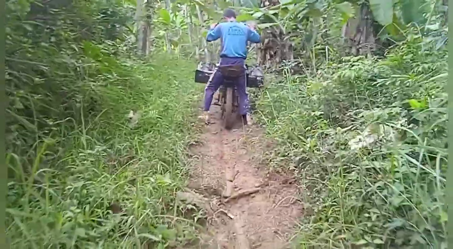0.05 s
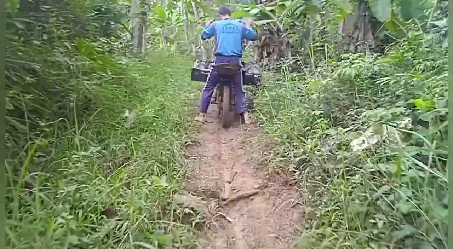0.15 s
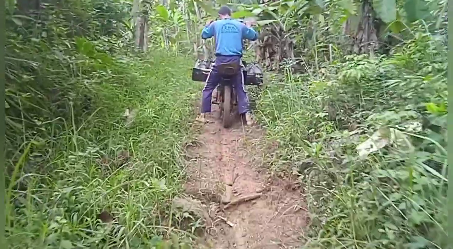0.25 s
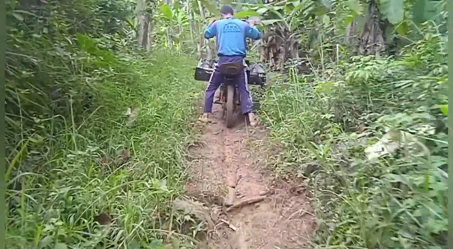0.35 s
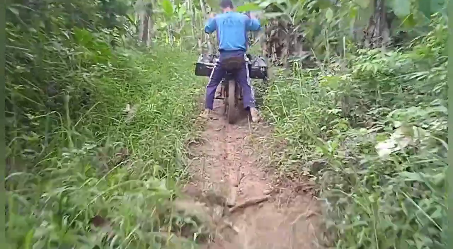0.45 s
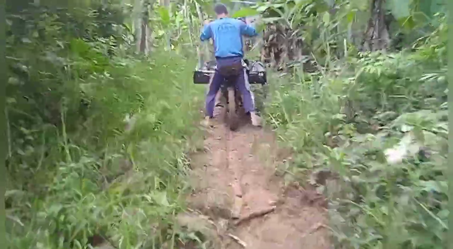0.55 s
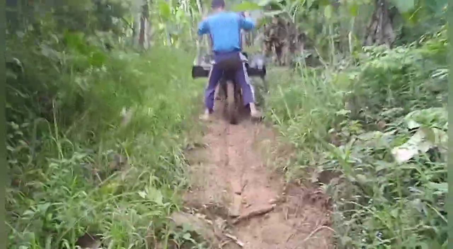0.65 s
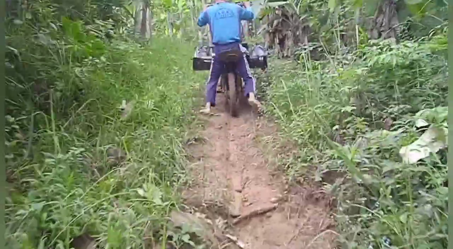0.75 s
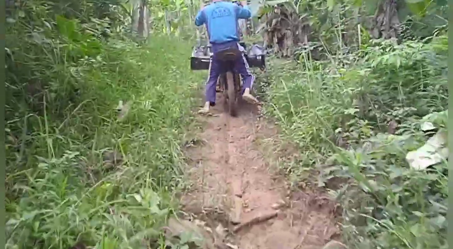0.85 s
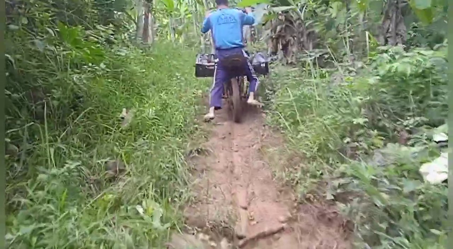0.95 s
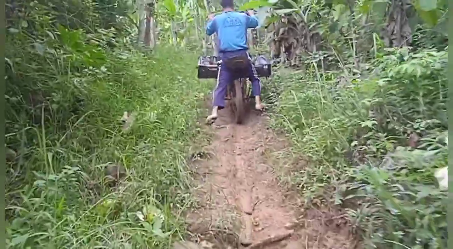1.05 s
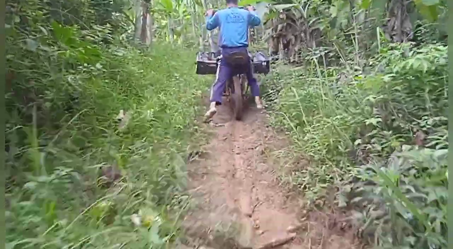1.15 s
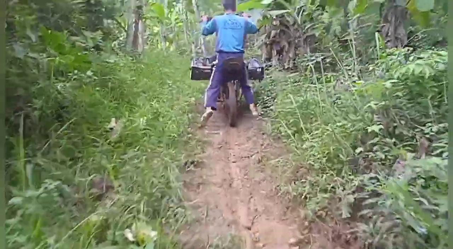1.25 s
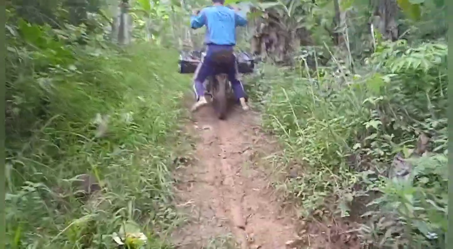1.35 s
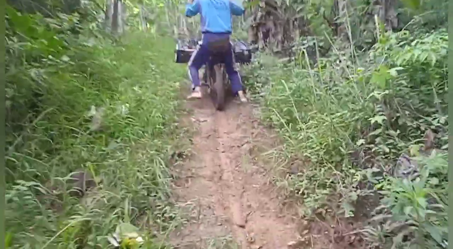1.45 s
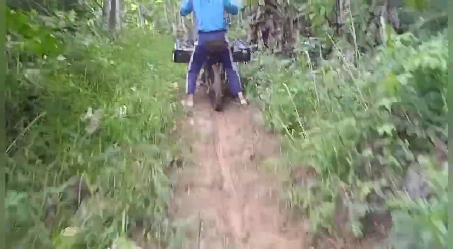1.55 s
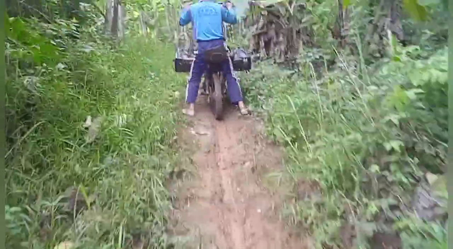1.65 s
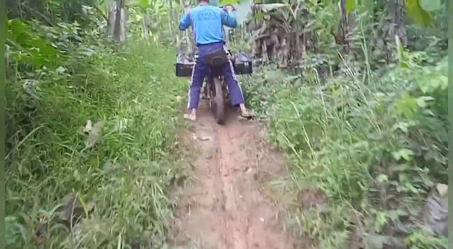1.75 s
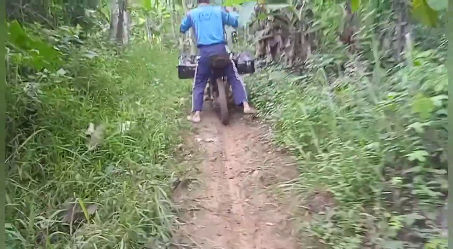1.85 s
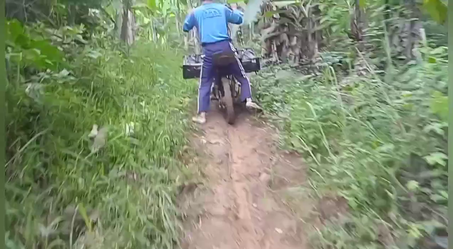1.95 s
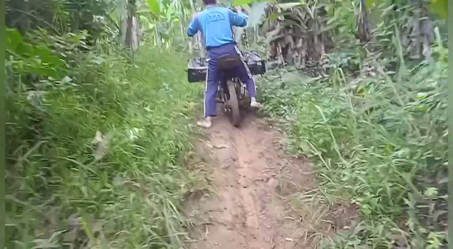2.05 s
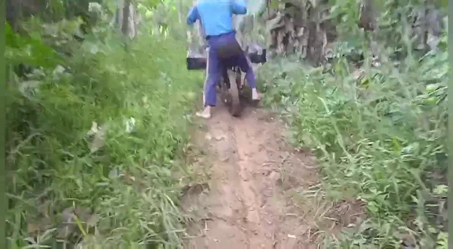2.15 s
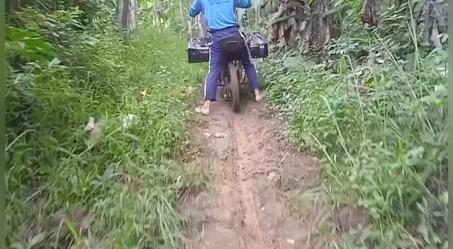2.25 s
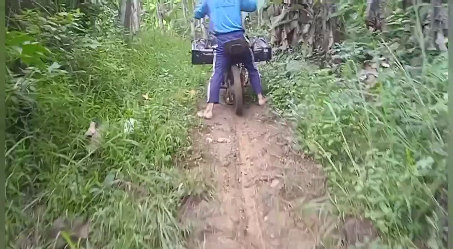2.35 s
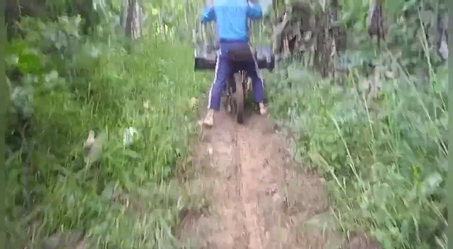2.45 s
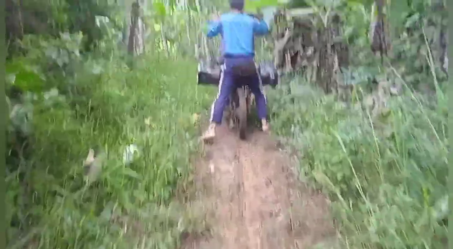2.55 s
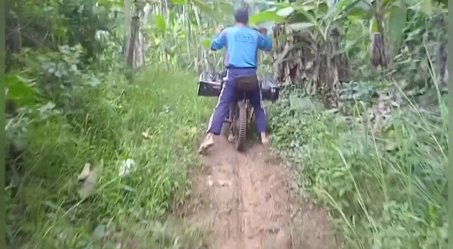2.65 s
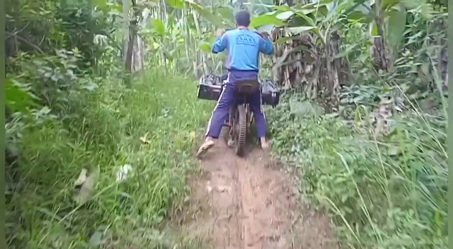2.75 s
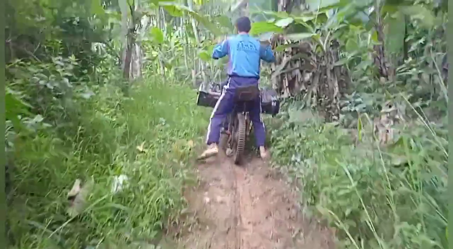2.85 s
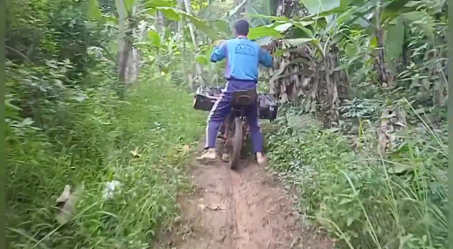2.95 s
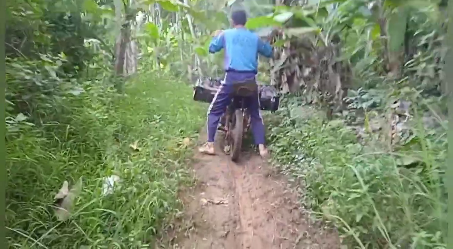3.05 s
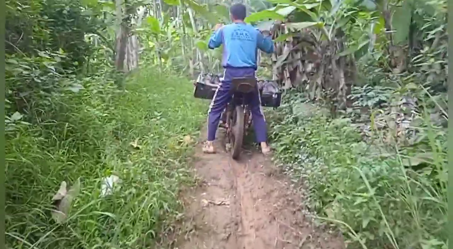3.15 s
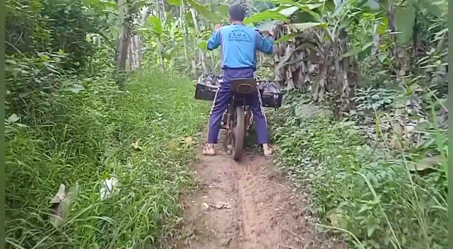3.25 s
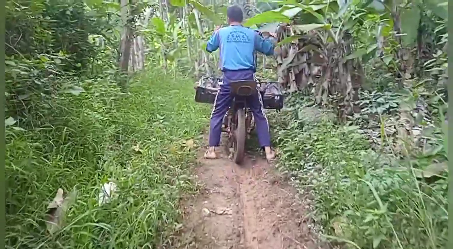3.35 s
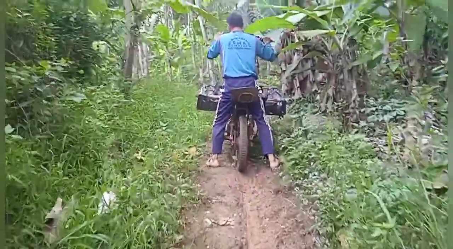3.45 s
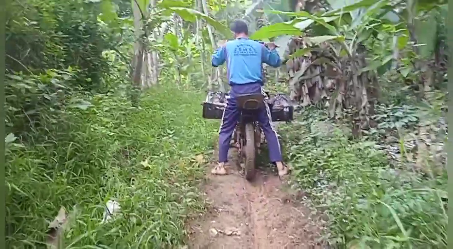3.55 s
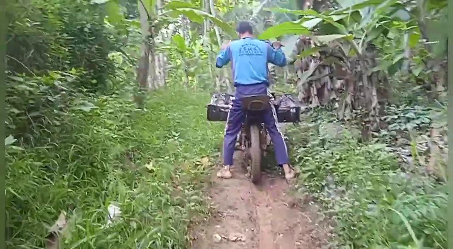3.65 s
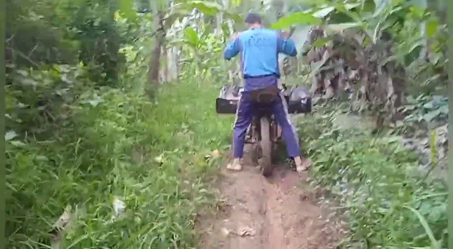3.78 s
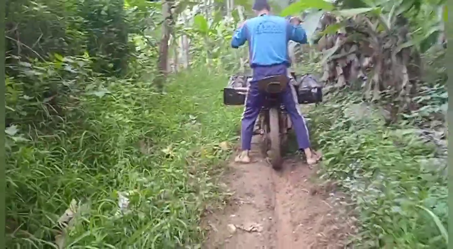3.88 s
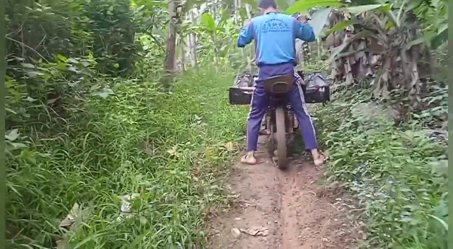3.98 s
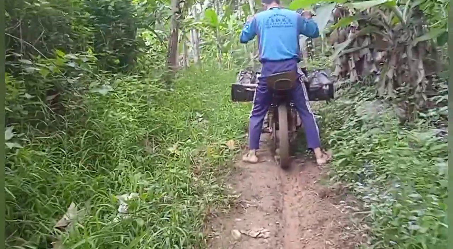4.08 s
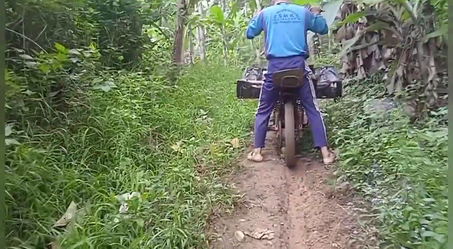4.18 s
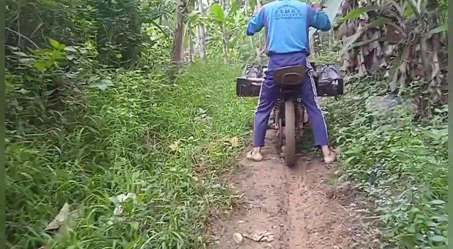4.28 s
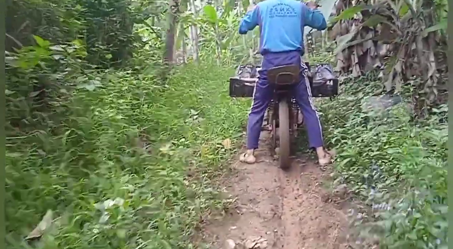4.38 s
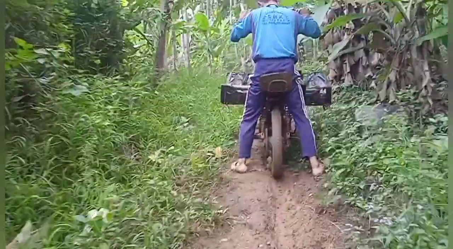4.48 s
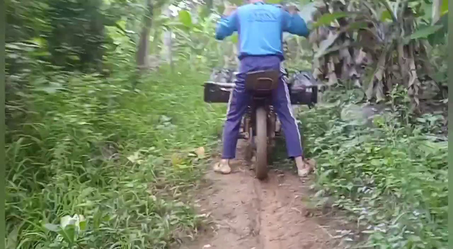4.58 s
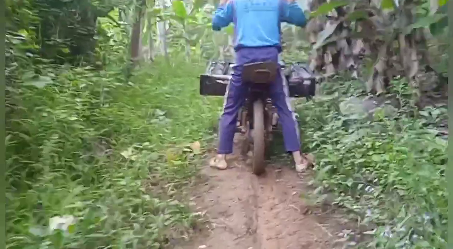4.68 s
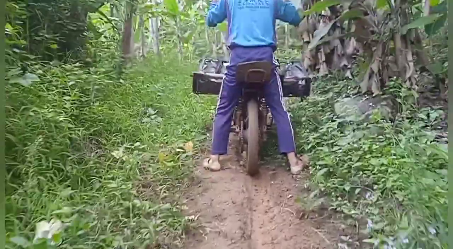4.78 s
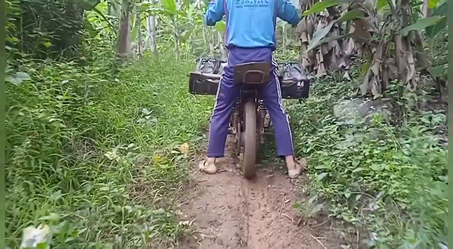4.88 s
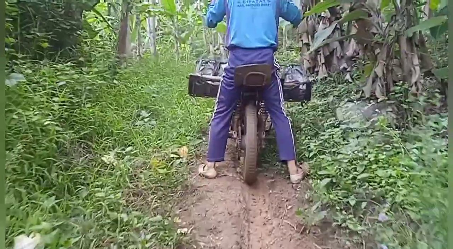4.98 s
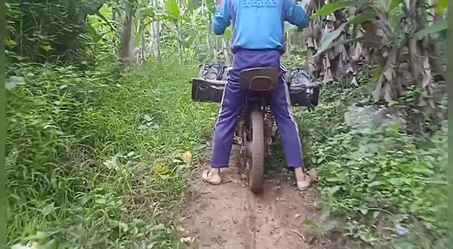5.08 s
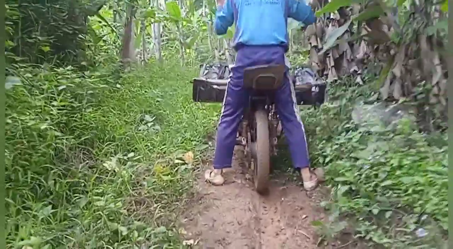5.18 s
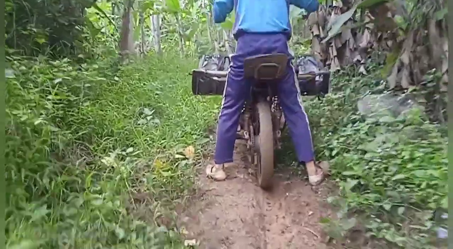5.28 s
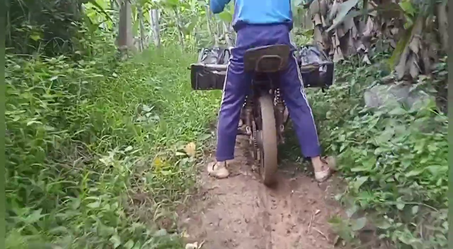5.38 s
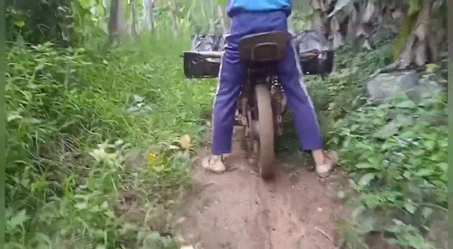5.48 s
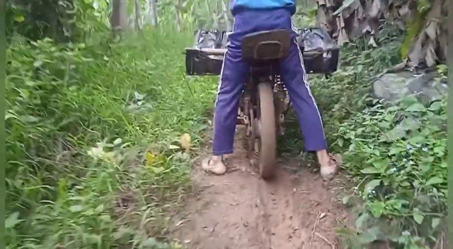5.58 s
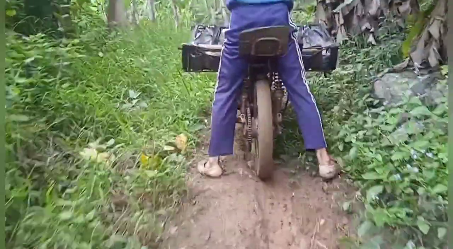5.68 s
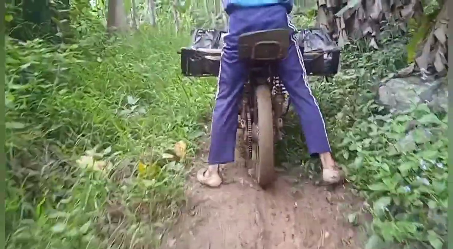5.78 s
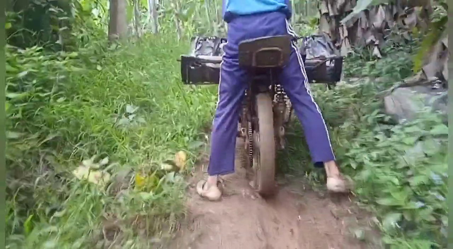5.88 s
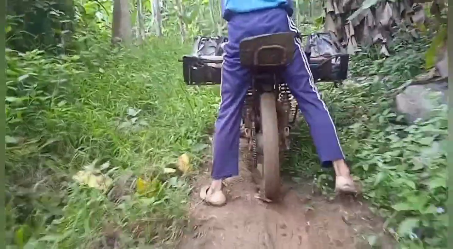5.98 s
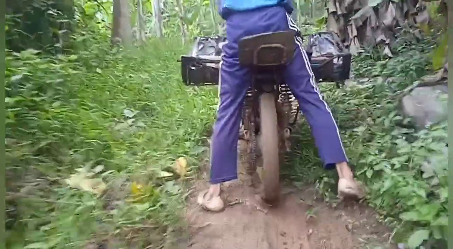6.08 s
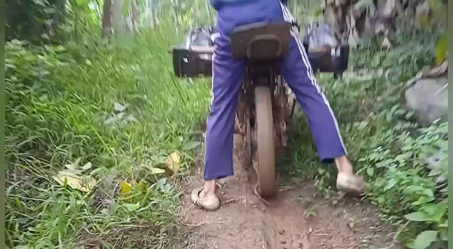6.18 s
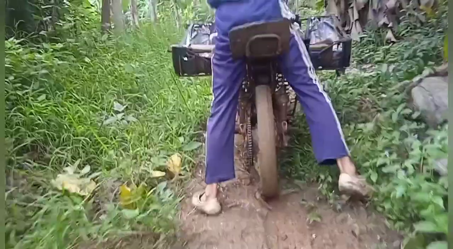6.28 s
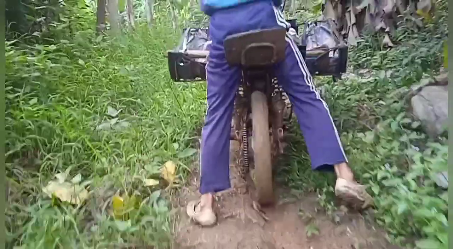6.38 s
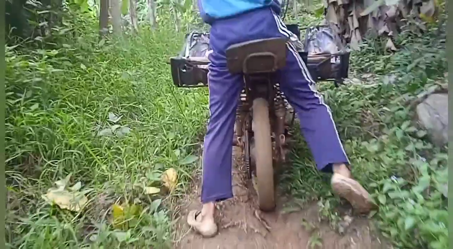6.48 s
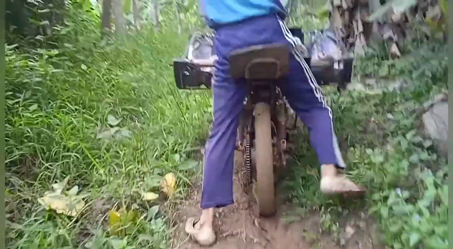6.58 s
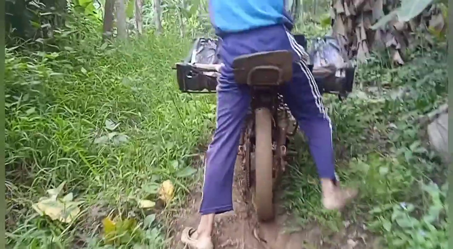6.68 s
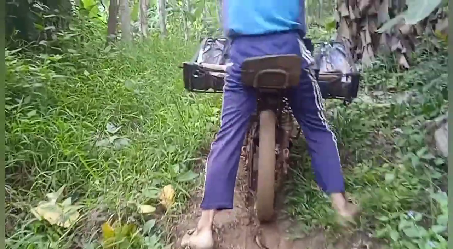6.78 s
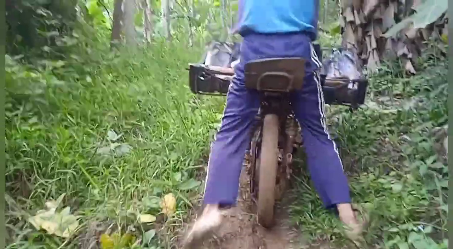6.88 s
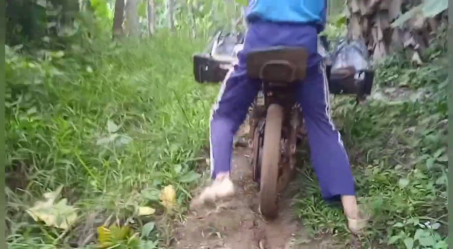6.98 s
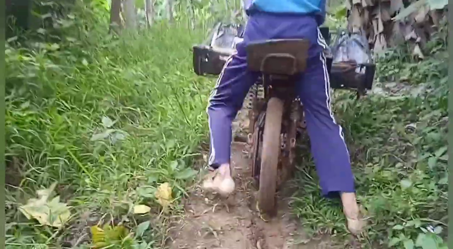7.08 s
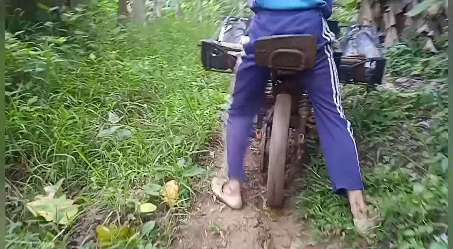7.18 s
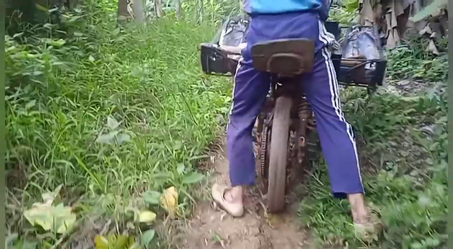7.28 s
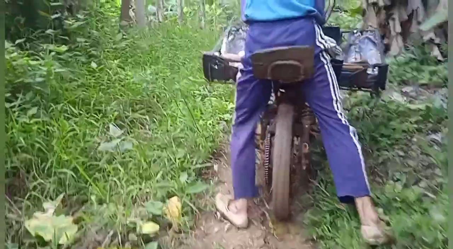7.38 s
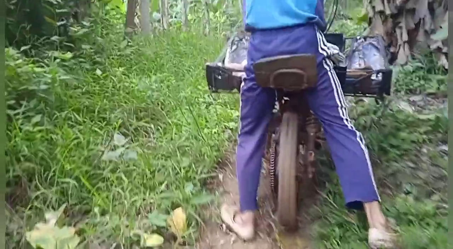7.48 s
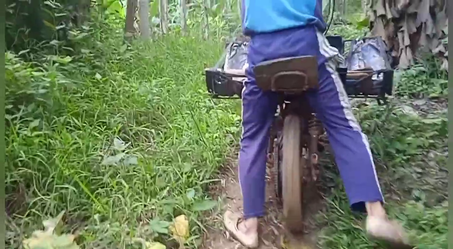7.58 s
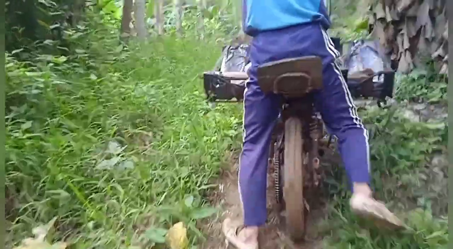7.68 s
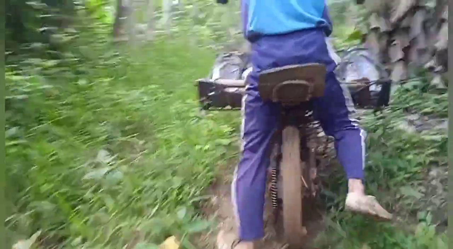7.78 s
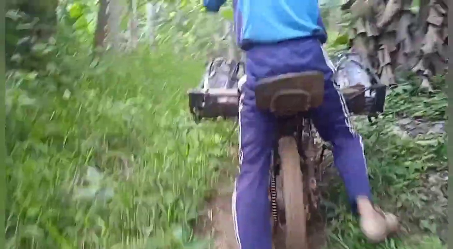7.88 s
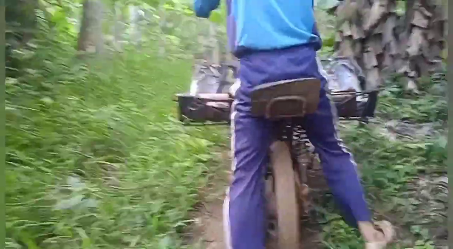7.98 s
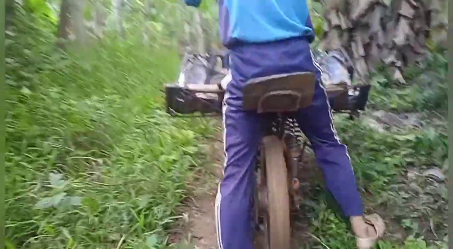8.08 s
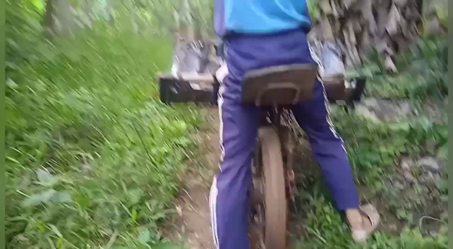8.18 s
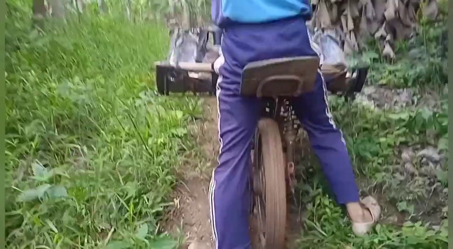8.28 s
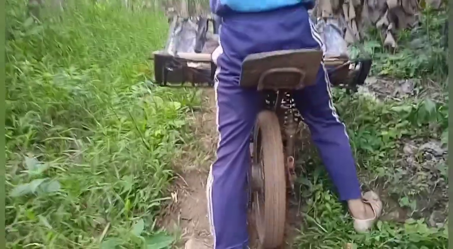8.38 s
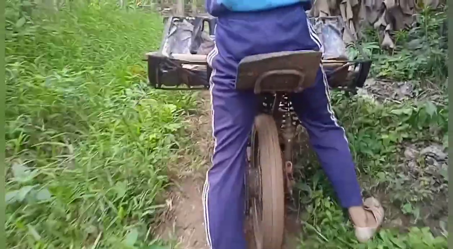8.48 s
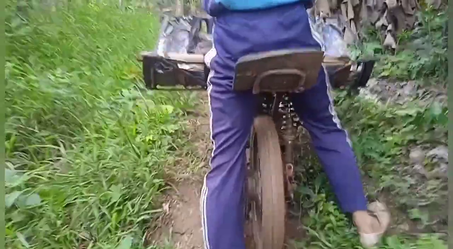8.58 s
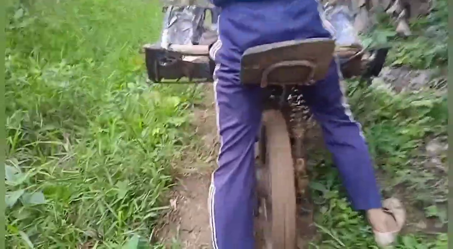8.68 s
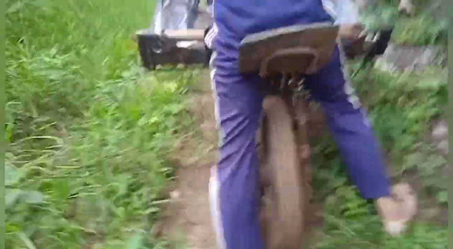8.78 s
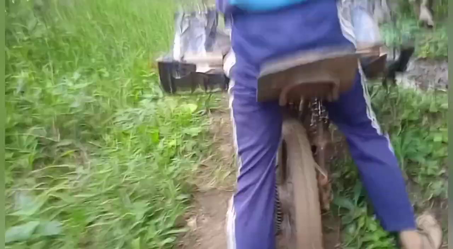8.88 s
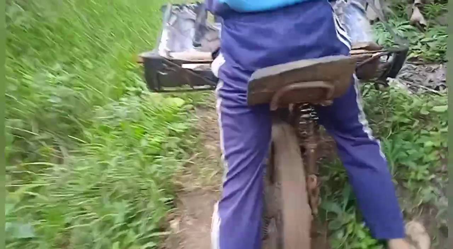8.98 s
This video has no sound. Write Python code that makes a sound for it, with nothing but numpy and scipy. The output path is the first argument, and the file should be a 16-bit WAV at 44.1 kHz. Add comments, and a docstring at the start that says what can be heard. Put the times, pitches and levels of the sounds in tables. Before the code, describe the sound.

A small one-cylinder four-stroke motorcycle runs throughout on a forest track, heard from a few metres behind. Its low, rapid thumping carries a hollow bark, a light metallic ring and a rasp of exhaust, over soft gear and chain clatter. Around 1 second the engine slows and loose metal rattles briefly. It is farthest and quietest at about 1.5 seconds, then draws steadily closer, picking up a little speed from 3 to 5 seconds, with occasional harder pops. From about 3 to 7 seconds a faint, high, pulsing whistle in the exhaust sinks in pitch. The engine dips briefly near 5.7 seconds, now close, and recovers. From 7 seconds it revs up, becoming higher, louder and raspier, and holds that faster beat from about 8.4 seconds to the end at 9. Foliage adds only a very short echo.

```python
"""First you hear the low thumping of a small one-cylinder four-stroke motorcycle on a forest track.
Each firing thumps out of the silencer, rings the pipe and ends in a rasp of escaping gas.
Gears and chain clatter, and a bank and the leaves throw the sound back. Loose metal rattles
as the engine slows, then the gas jet whistles, sinking in pitch. The listener falls behind
at first and then draws close, and near the end the engine revs up."""
import sys
import numpy as np
from scipy import signal
from scipy.fft import rfft, irfft
from scipy.io import wavfile

SR = 44100
rng = np.random.default_rng(int(sys.argv[2]) if len(sys.argv) > 2 else 0)


def materialize(psi):
    """Save the field psi as 16-bit PCM at rate SR to the path in sys.argv[1].

    A 1-D psi becomes a single channel; in a 2-D psi each row is a channel.
    """
    bounded = np.clip(np.atleast_2d(psi).T, -1, 1)
    quanta = np.round(bounded * 32767).astype(np.int16)
    wavfile.write(sys.argv[1], SR, quanta)


N = 398223
SIZE = 4096  # samples in one firing's sound
TIME, AGE, HZ = np.arange(N) / SR, np.arange(SIZE) / SR, np.fft.rfftfreq(SIZE, 1 / SR)
TOP_HZ = 15650


def amp(db):
    """Turns decibels into a gain."""
    return 10 ** (np.asarray(db) / 20)


def at(table, times, column=1):
    """Reads one column of a table at the given times."""
    table = np.asarray(table)
    return np.interp(times, table[:, 0], table[:, column])


def at_pitch(table, hz):
    """Reads a table at the given pitches, with octaves evenly spaced."""
    pitches, values = np.transpose(table)
    return np.interp(np.log(hz + 1), np.log(pitches), values)


def unit(x):
    """Scales each short sound to an energy of one."""
    return x / np.sqrt(np.sum(x ** 2, -1, keepdims=True))


def colour(spectrum):
    """A filter with the given tone colour that never sounds before it is struck."""
    log_gain = np.log(amp(at_pitch(spectrum, HZ)))
    mirrored = np.r_[log_gain, log_gain[-2:0:-1]]
    return np.exp(np.conj(signal.hilbert(mirrored)))[:len(HZ)]


def resonance(hz, width):
    """A filter that rings at one pitch; the narrower it is, the longer it rings."""
    return 1j * HZ * width / (hz ** 2 - HZ ** 2 + 1j * HZ * width)


def body(modes):
    """A filter for an object that rings at several pitches."""
    return sum(amp(db) * resonance(hz, width) for hz, width, db in modes)


def delay(seconds):
    """A filter that makes a sound arrive later."""
    return np.exp(-2j * np.pi * HZ * seconds)


def puffs(times, rise_s, fall_s):
    """The spectrum of one puff of swirling gas for each firing."""
    shape = (1 - np.exp(-(AGE / rise_s) ** 2)) * np.exp(-AGE / fall_s)
    return rfft(unit(rng.standard_normal((len(times), SIZE)) * shape))


# how fast the engine runs: (time [s], rate [firings/s])
FIRING_RATE = [(0.0, 24.87), (0.26, 25.45), (0.91, 22.0), (1.2, 22.16), (1.4, 20.96), (2.39, 20.81),
               (3.05, 21.4), (3.41, 22.34), (4.2, 22.89), (4.72, 23.72), (5.01, 24.74), (5.3, 24.68),
               (5.69, 22.59), (6.2, 24.23), (6.81, 24.54), (7.01, 24.39), (7.64, 28.83), (8.03, 32.37),
               (8.4, 34.48), (9.03, 34.21)]
def firings():
    """The times when the exhaust valve opens, once in each engine cycle."""
    cycles = .448 + np.cumsum(at(FIRING_RATE, TIME)) / SR
    return TIME[1:][np.diff(np.floor(cycles)) > 0]


def speed(times, cruise_per_s=23):
    """Engine speed as a multiple of cruising speed."""
    return at(FIRING_RATE, times) / cruise_per_s


def pull(times, span_s=0.61):
    """Firing rate gained each second: a sign of open throttle."""
    return (at(FIRING_RATE, times + span_s / 2) - at(FIRING_RATE, times - span_s / 2)) / span_s


# from the tailpipe to the listener: (time [s], distance [m])
DISTANCE = [(0, 5.9), (1.5, 9.14), (2.7, 7.6), (4, 5.3), (4.8, 3.91), (5.6, 3.03), (6.9, 3.02), (8.2, 2.48),
            (9.03, 2.4)]
def level(law, times, midway_m=5):
    """A part's level in dB. Its law gives the level when cruising midway_m away, then what is added
    for each doubling of speed, each halving of distance and each unit of pull."""
    base_db, speed_db, near_db, pull_db = law
    nearness = np.log2(midway_m / at(DISTANCE, times))
    return base_db + speed_db * np.log2(speed(times)) + near_db * nearness + pull_db * pull(times)


def play(times, spectra, level_db):
    """Places one short sound at each firing, so that the whole run has the given level."""
    gain = amp(level_db) * np.sqrt(SR / at(FIRING_RATE, times))
    sounds = unit(irfft(spectra)) * gain[:, None]
    out = np.zeros(N + SIZE)
    for start, sound in zip(np.round(times * SR).astype(int), sounds):
        out[start:start + SIZE] += sound
    return out[:N]


def burns(times, rebound=0.33):
    """No two firings burn alike, and a weak one tends to follow a strong one."""
    luck = np.clip(rng.standard_normal(len(times) + 1), -2, 2)
    return (luck[1:] - rebound * luck[:-1]) / np.hypot(1, rebound)


# firings that burn harder than their neighbours: (time [s], extra bark [dB], extra rasp [dB])
HARD_BURNS = [(.184, 4, 3), (.94, 2.5, -0.5), (1.16, -0.5, 3), (3.25, 2, 3), (3.385, 3, 5),
              (3.785, 1.5, 3.5), (4.09, 4, -1), (4.655, 2.5, 2), (4.94, 3, 4.5), (5.23, 0.5, 3),
              (5.435, 4, 0.5), (5.519, 4.5, 3.5), (5.693, 5, 2.5), (6.45, -1, 3), (6.86, 3.5, 4.5),
              (6.943, 3.5, 0), (7.185, 2.5, -0.5), (8.32, 3.5, 4.5), (8.47, 1, 0.5), (8.79, -1, 4.5)]
def hard_db(times, part):
    """Extra bark or rasp for the firing nearest to each hard burn."""
    extra_db = np.zeros(len(times))
    for time, bark_db, rasp_db in HARD_BURNS:
        extra_db[np.argmin(abs(times - time))] = bark_db if part == "bark" else rasp_db
    return extra_db


# bands the silencer cancels: (pitch [Hz], width [Hz], depth [0-1])
CANCELLED_BANDS = [(402, 57, 0.43), (850, 82, 1)]
def side_chambers():
    """A filter for the silencer's side chambers, which swallow narrow bands of sound."""
    return np.prod([1 - depth * resonance(hz, width) for hz, width, depth in CANCELLED_BANDS], 0)


# the echo off the bank: (time [s], delay [s], strength [factor])
BANK_ECHO = [(0, 0.0086, 0.28), (1.5, 0.0076, 0.37), (3.2, 0.01, 0.23), (5.15, 0.009, 0.24),
             (5.9, 0.0081, 0.13), (7.4, 0.0081, 0.2), (8.4, 0.0053, 0.19)]
def bank_echo(when):
    """A filter that adds one bounce off the bank to the direct sound."""
    return 1 + at(BANK_ECHO, when, column=2) * delay(at(BANK_ECHO, when))


# the thump's tone colour: (pitch [Hz], level [dB])
THUMP_COLOUR = [(30, -27.5), (60, -47), (80, -19), (115, -13.5), (160, -7), (220, 1.5), (290, 0.5),
                (345, -2), (400, -10.5), (520, -19.5), (800, -55.5), (1500, -75.5)]
# swells of its upper note: (middle [s], length [s], pitch [Hz], level against the thump [dB])
THUMP_SWELLS = [(.7, 2.5, 328, -3), (5.15, 0.75, 337, -1), (7.3, 1.0, 269.8, -12)]
# loudness of the thump, and of its boom against it: (base [dB], speed [dB], nearness [dB], pull [dB])
THUMP_LAW = (-28, 4, 6, 0.0363)
BOOM_LAW = (3, -17, 9, -0.13)
def thump(times, burn, spread_db=.5, cruise_boom_hz=127):
    """The pressure pulse leaves the silencer as a thump, with a boom whose pitch climbs with speed."""
    when = times[:, None]
    boom_hz = cruise_boom_hz * speed(when)
    boom = amp(level(BOOM_LAW, when)) * resonance(boom_hz, 71) * resonance(boom_hz, 2.93 * boom_hz)
    upper_note = sum(amp(db) * np.exp(-(2 * (when - middle) / length) ** 2) * resonance(hz, 59)
                     for middle, length, hz, db in THUMP_SWELLS)
    pulse = -colour(THUMP_COLOUR) * (1 + boom) * (1 + upper_note) * delay(0.0015)
    level_db = level(THUMP_LAW, times) + spread_db * burn
    return play(times, pulse * side_chambers() * bank_echo(when), level_db)


# how the silencer's chamber rings at cruising speed: (pitch [Hz], width [Hz], level [dB])
CHAMBER_MODES = [(469, 150, 14), (626, 93, 10.5), (690, 47, 5.5), (778, 32, -1)]
# the bark's loudness: (base [dB], speed [dB], nearness [dB], pull [dB])
BARK_LAW = (-37.5, 5, 7, 0.13)
def bark(times, burn, spread_db=0.88, rough=0.29, heating=0.15):
    """The same pulse barks in the silencer's chamber."""
    when = times[:, None]
    heat = speed(when) ** heating  # hotter gas at speed raises the pitch
    chamber = body([(hz * heat, width, db) for hz, width, db in CHAMBER_MODES])
    voice = chamber * resonance(670, 187) ** 2
    pulse = rough * puffs(times, rise_s=0.00067, fall_s=0.0083) - delay(0.002042)
    level_db = level(BARK_LAW, times) + spread_db * burn + hard_db(times, "bark")
    return play(times, pulse * voice * side_chambers() * bank_echo(when), level_db)


# the pipe's tone colour: (pitch [Hz], level [dB])
PIPE_COLOUR = [(600, -29), (880, -6), (1010, 0.5), (1200, 4.5), (1360, -8.5), (1600, 2), (1900, -0.5),
               (2280, -2.5), (2500, -15.5), (3500, -20), (6000, -61.5)]
# how the pipe rings: (pitch [Hz], width [Hz], level [dB])
PIPE_MODES = [(1560, 190, 0.5), (1710, 150, -10.5), (2080, 200, -2)]
# the ping's loudness: (base [dB], speed [dB], nearness [dB], pull [dB])
PING_LAW = (-44.5, 2, 7, 0.12)
def ping(times):
    """The steep front of the pulse sets the pipe ringing."""
    front = 1 + puffs(times, rise_s=0.0016, fall_s=0.011)
    voice = body(PIPE_MODES) * colour(PIPE_COLOUR) * side_chambers()
    return play(times, front * voice, level(PING_LAW, times))


# passing tones: (start [s], end [s], first pitch [Hz], last pitch [Hz], level against the ping [dB])
EXHAUST_TONES = [(-.2, 0.54, 1840, 1590, 3.5), (0.0, 1.8, 800, 760, 1), (.9, 2.3, 1046, 1030, -0.5),
                 (1.9, 2.4, 1660, 1730, 6.5), (2.3, 5.6, 980, 1004, 2.5), (3.05, 3.6, 4900, 4670, -2),
                 (3.202, 4.67, 1920, 1950, 6), (3.2, 4.34, 2620, 2560, -6.5), (4.4, 6.8, 1656, 1650, 0),
                 (4.9, 5.73, 1190, 1141, 3), (5.6, 7.52, 1130, 1203, 4.5), (7.0, 7.7, 3510, 3400, -6.5),
                 (7.2, 9.3, 2260, 2110, 2.5), (8.2, 9.03, 510, 520, -2.5), (8.3, 9.2, 4680, 4800, 1.5)]
def exhaust_tones(times, burn, rough=0.79, swell=0.48, spread_db=0.86):
    """For a while a tone rings out of the exhaust with each firing: it swells, glides and fades."""
    out = np.zeros(N)
    level_db = level(PING_LAW, times) + spread_db * burn + .5 * hard_db(times, "bark")
    for start, end, first_hz, last_hz, db in EXHAUST_TONES:
        held = (times > start) & (times < end)
        when = times[held]
        progress = (when - start) / (end - start)
        hz = (first_hz + (last_hz - first_hz) * progress)[:, None]
        ring = resonance(hz, 50 + 0.015 * hz) * resonance(hz, hz / 3)
        front = delay(0.000616) * (1 + rough * puffs(when, rise_s=0.0011, fall_s=0.0054))
        arch_db = swell * 20 * np.log10(np.sin(np.pi * progress))
        out += play(when, ring * front, level_db[held] + db + arch_db)
    return out


def spits(times, low_hz, high_hz, width_hz, strength, count):
    """A filter that makes each puff of gas sing at a few chance pitches."""
    pitches = rng.uniform(low_hz, high_hz, (len(times), count))
    return 1 + strength * sum(resonance(hz[:, None], width_hz) for hz in pitches.T)


# the roar's loudness: (base [dB], speed [dB], nearness [dB], pull [dB])
ROAR_LAW = (-44, 12, 5, -0.08)
def roar(times, burn, spread_db=1.75):
    """The gas behind the pulse keeps the pipe roaring for a moment."""
    singing = spits(times, 1578, 2470, width_hz=130, strength=4.2, count=2)
    gas = puffs(times, rise_s=0.002, fall_s=0.0054)
    level_db = level(ROAR_LAW, times) + spread_db * burn + .5 * hard_db(times, "bark")
    return play(times, colour(PIPE_COLOUR) * side_chambers() * singing * gas, level_db)


# the rasp's tone colour: (pitch [Hz], level [dB])
RASP_COLOUR = [(1000, -33), (2000, -18), (2700, 3), (3200, -7), (3650, -4), (4050, -7), (4780, 0.5),
               (5400, -3.5), (7400, -4), (8800, -13.5), (11000, -9), (13700, -22), (15000, -1), (16000, -7)]
# how the tailpipe's wall rings: (pitch [Hz], width [Hz], level [dB])
TAILPIPE_MODES = [(4757, 280, -0.5)]
# the rasp's loudness: (base [dB], speed [dB], nearness [dB], pull [dB])
RASP_LAW = (-44.5, 8.5, 6, 0.3)
def rasp(times, burn, spread_db=1.47, brightening=0.68):
    """Gas snaps and tears out of the tailpipe, brighter under throttle."""
    singing = spits(times, 2580, 9250, width_hz=167, strength=2.2, count=3)
    voice = 1.32 * body(TAILPIPE_MODES) + singing
    tilt = amp(brightening * pull(times)[:, None] * HZ / TOP_HZ)
    tear = puffs(times, rise_s=0.0025, fall_s=0.0056) * delay(0.000404)
    snap = 0.57 * puffs(times, rise_s=0.00039, fall_s=.0012) * delay(.0015)
    level_db = level(RASP_LAW, times) + spread_db * burn + hard_db(times, "rasp")
    return play(times, colour(RASP_COLOUR) * tilt * voice * (tear + snap), level_db)


# the clatter's tone colour: (pitch [Hz], level [dB])
CLATTER_COLOUR = [(30, -26), (70, 6), (220, 9.5), (480, -0.5), (730, 0), (890, -5.5), (1050, 0),
                  (1700, 3.5), (2300, -7), (3800, -9), (4800, -15), (7000, -9.5), (9500, -41),
                  (13500, -15.5), (15000, -42)]
# its loudness: (base [dB], speed [dB], nearness [dB], pull [dB])
CLATTER_LAW = (-45, 10.5, 2, 0.13)
def clatter(knocks_per_s=600, knock_share=0.34):
    """Gears and chain rustle all the time, with many small loose knocks."""
    knock_power = (rng.random(N) < knocks_per_s / SR) * SR / knocks_per_s
    rustle = rng.standard_normal(N) * np.sqrt(1 - knock_share + knock_share * knock_power)
    metal = unit(irfft(colour(CLATTER_COLOUR)))
    return signal.oaconvolve(rustle, metal)[:N] * amp(level(CLATTER_LAW, TIME))


# the hum's loudness: (base [dB], speed [dB], nearness [dB], pull [dB])
CRANK_LAW = (-67.5, 35, 3.5, .1)
def crank():
    """The crank turns twice per firing; its hum comes up as the engine revs."""
    turns = 2 * np.cumsum(at(FIRING_RATE, TIME)) / SR
    return np.sqrt(2) * amp(level(CRANK_LAW, TIME)) * np.sin(2 * np.pi * turns)


# how long the forest echoes: (pitch [Hz], time to fade by 60 dB [s])
FOREST_FADE = [(100, 0.016), (400, 0.075), (1500, 0.27), (5000, 0.17), (15000, 0.17)]
def forest(sound, patterns=15, echoes_per_s=3000):
    """Leaves and trunks scatter a short tail of echoes, which changes as the listener moves on."""
    out = np.zeros(N)
    for centre in np.linspace(0, 1, patterns):
        echoes = rng.standard_normal(2 * SIZE) * (rng.random(2 * SIZE) < echoes_per_s / SR)
        hz, age, bands = signal.stft(echoes, SR, nperseg=128)
        fade = amp(-60 * age / at_pitch(FOREST_FADE, hz)[:, None])
        tail = signal.istft(bands * fade, SR)[1]
        onset = np.clip(np.arange(len(tail)) / SR / 0.00043 - 1, 0, 1)
        offset = (TIME / TIME[-1] - centre) * (patterns - 1)
        share = np.cos(np.pi / 2 * np.clip(offset, -1, 1))  # each pattern blends into the next
        out += signal.oaconvolve(sound * share, unit(tail * onset))[:N]
    return out


# short rattles: (middle [s], length [s], level [dB])
RATTLES = [(0.868, 0.089, -49), (0.993, 0.044, -48), (1.075, 0.054, -58)]
# how the loose metal rings: (pitch [Hz], width [Hz], level [dB])
LOOSE_METAL_MODES = [(1800, 110, 2.5), (2020, 180, 1)]
def rattle():
    """Loose metal chatters briefly as the throttle shuts."""
    swell = sum(amp(db) * np.exp(-(2 * (TIME - middle) / length) ** 2) for middle, length, db in RATTLES)
    metal = unit(irfft(body(LOOSE_METAL_MODES)))
    return signal.oaconvolve(rng.standard_normal(N) * swell, metal)[:N]


# the whistle's long falling glide: (time [s], pitch [Hz], level against the rasp [dB])
JET_GLIDE = [(2.3, 7860, -24), (3, 7700, -8), (3.9, 6200, -2), (5.2, 6040, -1.5), (6, 5000, -6),
             (6.6, 5220, -1), (7.3, 4220, -14)]
def whistle(times, burn, spread_db=2, wander=0.036):
    """The gas jet chirps with each firing, at a slightly different pitch each time."""
    held = (times > JET_GLIDE[0][0]) & (times < JET_GLIDE[-1][0])
    when = times[held]
    hz = at(JET_GLIDE, when)[:, None] * (1 + wander * rng.standard_normal((len(when), 1)))
    voice = resonance(hz, width=220) * resonance(hz, width=2000)
    gas = puffs(when, rise_s=0.00066, fall_s=.0025) * delay(0.000796)
    level_db = level(RASP_LAW, times) + at(JET_GLIDE, times, column=2)
    level_db += spread_db * burn + hard_db(times, "rasp")
    return play(when, voice * gas, level_db[held])


def scene(low_echo_db=-20, ring_echo_db=-17, gas_echo_db=-8):
    """The engine and its forest echoes, in one channel."""
    times = firings()
    burn = burns(times)
    low = thump(times, burn) + bark(times, burn)
    ring = ping(times) + exhaust_tones(times, burn)
    gas = roar(times, burn) + rasp(times, burn) + whistle(times, burn)
    echoes = forest(amp(low_echo_db) * low + amp(ring_echo_db) * ring + amp(gas_echo_db) * gas)
    return (low + ring + gas + clatter() + crank() + echoes + rattle())[None]


def record(dry):
    """Cuts away the very highest treble."""
    lowpass = signal.firwin(255, TOP_HZ, window=("kaiser", 8), fs=SR)
    return signal.oaconvolve(dry, lowpass[None], "same")


dry = scene()
out = record(dry)
materialize(out)
```